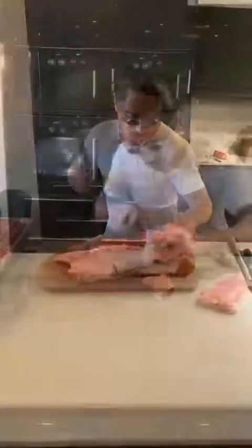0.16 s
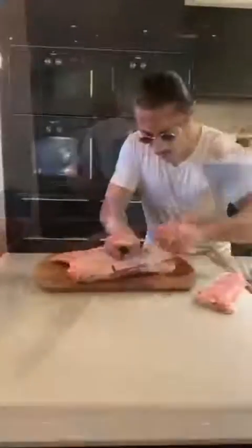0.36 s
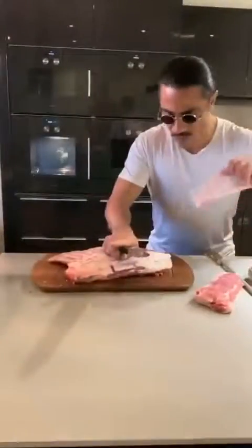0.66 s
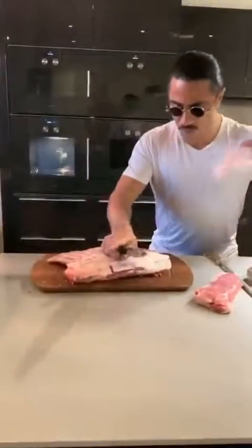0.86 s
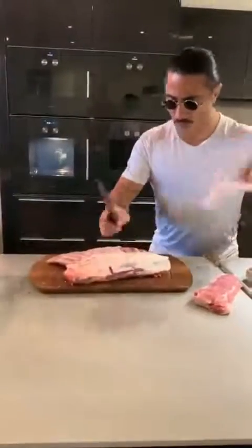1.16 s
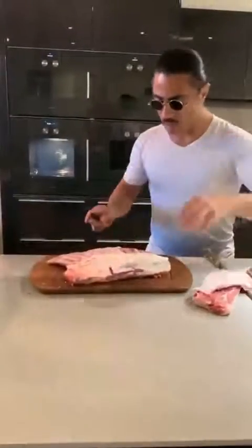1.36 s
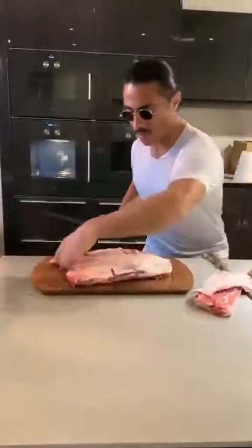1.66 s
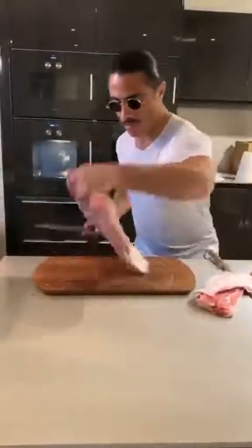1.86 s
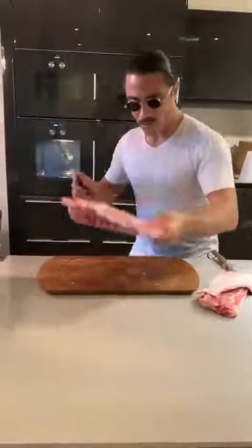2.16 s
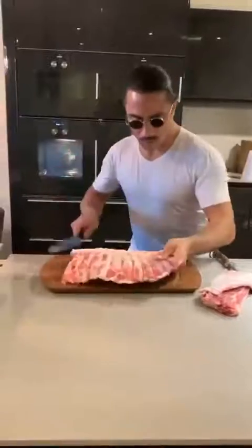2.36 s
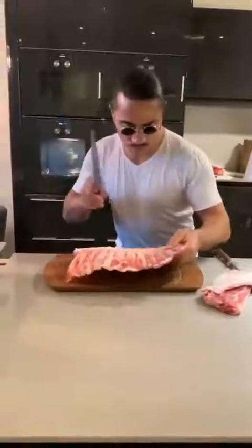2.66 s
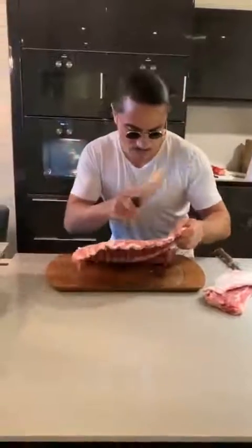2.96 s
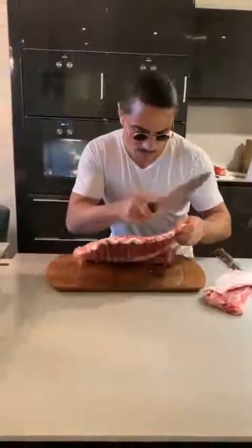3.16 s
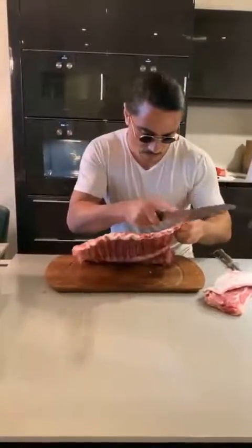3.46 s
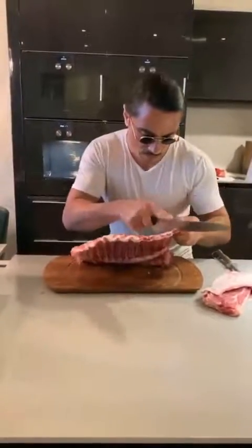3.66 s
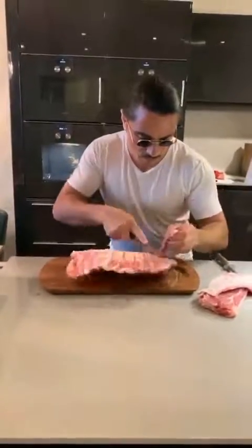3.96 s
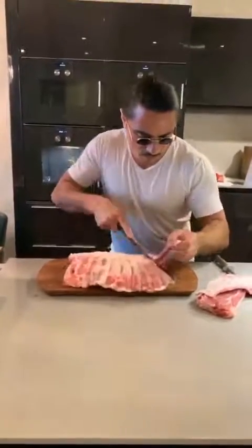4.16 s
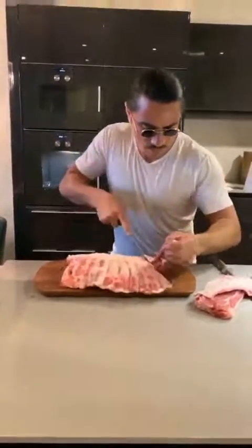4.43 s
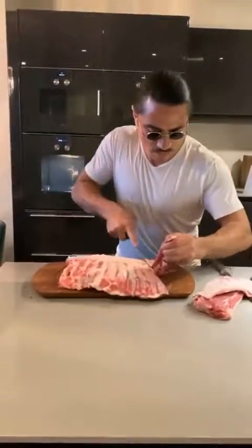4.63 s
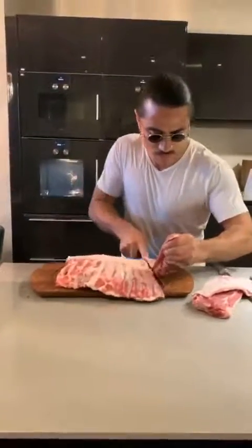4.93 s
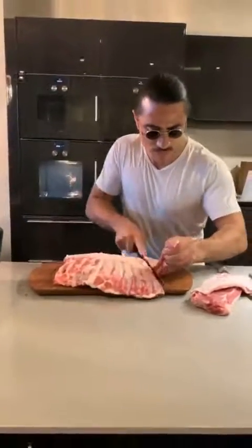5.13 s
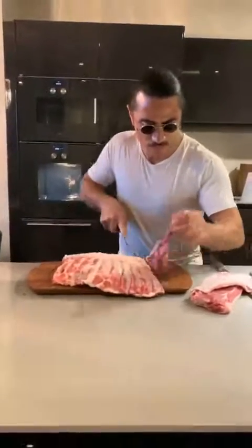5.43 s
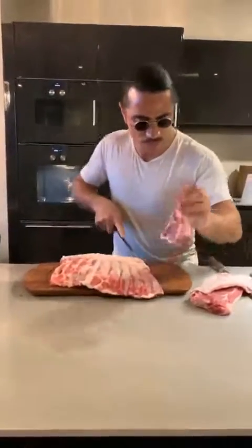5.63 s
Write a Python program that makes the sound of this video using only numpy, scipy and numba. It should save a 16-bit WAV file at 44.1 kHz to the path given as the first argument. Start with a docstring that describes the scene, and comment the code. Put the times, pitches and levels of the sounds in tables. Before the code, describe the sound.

In a hard-walled kitchen, wet meat smacks a board with a loud double slap, followed by soft knife strokes and faint clicks over hum.

```python
"""A kitchen with hard walls: a slab of raw ribs is torn, slapped and dropped on a wooden board on a counter,
and a long knife slides through it. Blows are noise cracks over ringing board modes; smearing, tearing and
sliding are crackly noise through resonances, with bands of grainy rubbing added. A faint tone swells once.
Diffuse echoes, a mains hum and room air lie around them. The phone turns itself down after loud blows."""
import sys
import numpy as np
from scipy import signal
from scipy.fft import rfft, irfft, next_fast_len
from scipy.io import wavfile
from scipy.ndimage import uniform_filter1d, minimum_filter1d
from numba import njit

SR = 44100
rng = np.random.default_rng(int(sys.argv[2]) if len(sys.argv) > 2 else 0)


def volts_from_decibels(level):
    """Turn decibel levels (scalar or array-like) into linear amplitude factors."""
    exponent = np.asarray(level, float) / 20
    return 10 ** exponent


def file_out(sig):
    """Save sig as 16-bit WAV at sys.argv[1]."""
    # one column per channel
    cols = np.atleast_2d(sig).T
    # limit, then scale
    lim = np.clip(cols, -1, 1)
    pcm = np.round(lim * 32767).astype(np.int16)
    wavfile.write(sys.argv[1], SR, pcm)


N = 255339
T = np.arange(N) / SR


def colour(x, points):
    """Filter by (Hz, dB) points joined on a log-frequency axis."""
    hz, db = np.transpose(points)
    n = next_fast_len(len(x))
    f = np.maximum(np.fft.rfftfreq(n, 1 / SR), 1)
    gain_db = np.interp(np.log(f), np.log(hz), db)
    return irfft(rfft(x, n) * volts_from_decibels(gain_db), n)[:len(x)]


def unit(x):
    """Scale to rms 1."""
    return x / np.sqrt(np.mean(x ** 2))


def walk(rate_hz):
    """Random levels held 1 / rate_hz s and slewed twice; spread near 1."""
    k = int(SR / rate_hz)
    steps = np.repeat(rng.standard_normal(N // k + 1), k)
    return 1.7 * uniform_filter1d(uniform_filter1d(steps, k), k)[:N]


def grains(sparse_db):
    """Noise whose samples have a long-tailed size: wet crackle."""
    size = uniform_filter1d(rng.exponential(size=N), size=24)
    return rng.standard_normal(N) * volts_from_decibels(sparse_db * size * 2)


def contacts(spray_db=-23):
    """Every blow and click as (s, crack, knock, tick, spray, thud dB); spray_db is wet spray against the tick."""
    # Blows on the board. Each row: start in seconds, crack in dB, then knock, tick and thud in dB re crack.
    struck = [(0.0034, -35, -2, -11, -1.5), (0.0611, -47, -38, -5.5, 12.5),
              (0.352, -8.5, -17.5, -13, -18.5), (0.363, -33.5, -14, 0, 19), (0.413, -38.5, 12.5, -7, 13.5),
              (0.473, -37.5, 4, -29, 12.5), (1.25, -28.5, -15, -20, -23.5), (1.265, -38.5, -19, -6, -1),
              (1.6027, -37.5, 10.5, -10.5, -18.5), (1.6187, -51, 15.5, 4.5, 16.5),
              (1.6535, -60, 16, -5, 27), (1.738, -49, 7, -9, -8), (1.7895, -45, -4, -1, -16),
              (2.2224, 4, 3.5, -18.5, -15.5), (2.2384, -14.5, -11.5, -11.5, 9),
              (2.2465, -8.5, -3.5, -40.5, -14.5), (2.262, -9.5, 2.5, -15, -5.5), (2.27, -5, 0, -26, -6.5),
              (2.2866, -14.5, 2, -21.5, 2.5), (2.3054, -16, -13, -0.5, -14), (2.3134, 10, -15.5, -8, -28.5),
              (2.3164, -10, 11.5, -10, -4.5), (3.457, -73.5, 24.5, -19, 3.5), (3.6374, -66, 18, -17, 17),
              (3.966, -54, -3, -11, -3), (4.0312, -24, -9.5, -21.5, -16), (4.1412, -68, 22, -13, 2),
              (4.632, -61, 19, -22, 20), (4.8996, -55.5, -18, -4, 12)]
    # Faint wet clicks as meat comes unstuck. Each row: start in seconds, level in dB.
    unstuck = [(0.933, -73), (0.963, -61), (1.993, -60), (2.9395, -60.5), (3.381, -65), (4.285, -61),
               (3.712, -67), (4.614, -55.5), (5.036, -61)]
    # Crack, knock, tick, spray and thud of a click, in dB re its level.
    click_parts_db = [6, -8, -3.5, -5, 5.5]
    hits = []
    for s, crack, knock, tick, thud in struck:
        hits.append((s, crack, crack + knock, crack + tick, crack + tick + spray_db, crack + thud))
    for s, db in unstuck:
        hits.append((s, *(db + np.array(click_parts_db))))
    return hits


def blows(brush_db=-18, scuff=0.84, crack_db=-6, ring_db=-7, swell_cycles=0.06, hold_s=0.005, spot_db=1.0):
    """One main contact in a short scuff of small ones sets the modes ringing; a crack of noise rides on it."""
    # Centres of crack, knock, tick, spray and thud, in Hz.
    part_hz = [1500, 500, 3700, 9000, 100]
    # Ringing modes of board and counter. Each row: nominal frequency in Hz, relative level in dB, T60 in seconds.
    modes = [(51, 0.5, .15), (78.6, 7, 0.13), (142.9, 7.5, 0.09), (245, -4.5, 0.05), (325, -0.5, 0.041),
             (413.4, -1, 0.036), (505.5, 6.5, 0.0096), (607, -5.5, 0.03), (693.3, -8, 0.036),
             (850, -13, 0.011), (1042, -3, 0.0044), (1210, -11.5, 0.012), (1370, -8.5, 0.004),
             (1492, -9.5, 0.018), (1754, -12, 0.017), (1913, -2, 0.022), (2215, -6, 0.039),
             (2432, -9.5, 0.009), (2654, -11, 0.0082), (2908, -6, 0.012), (3303, -4, 0.0095),
             (3665, -2.5, 0.013), (4062, -7, 0.009), (4477, -8.5, 0.0087), (4620, -12, 0.0093),
             (5040, -13, 0.011), (5397, -17, 0.011), (6050, -16.5, 0.011), (6700, -16.5, 0.01)]
    rise_s, press_s, fall_s = 0.0012, 0.007, 0.0035
    t, lead = np.arange(SR // 4) / SR, SR // 80
    near = np.arange(SR // 20) / SR - lead / SR
    # a light brush, the landing, a short press, release
    before = np.exp(near / rise_s) + volts_from_decibels(brush_db) * (1 + near * SR / lead)
    after = np.exp(-np.maximum(near - press_s, 0) / fall_s)
    shape = np.where(near < 0, before, after)

    hz, mode_db, t60 = np.array(modes).T[:, :, None]
    # soft meat spreads the contact: each mode swells in over part of its cycle and holds while the push lasts
    swell = (1 - np.exp(-t * hz / swell_cycles)) ** 2
    fade = swell * 1000. ** (-np.maximum(t - hold_s, 0) / t60)

    out, by_hz = np.zeros(N + SR), np.argsort(part_hz)
    for s, *parts in contacts():
        tilt = np.transpose([part_hz, parts])[by_hz]
        push_noise, crack_noise = rng.standard_normal((2, len(near)))
        detune, side, spot = rng.standard_normal((3, *hz.shape))  # each blow lands on another spot
        tilt_db = np.interp(np.log(hz), np.log(tilt[:, 0]), tilt[:, 1])
        gain = np.sign(side) * volts_from_decibels(mode_db + spot_db * spot + tilt_db)
        ring = np.sum(gain * np.sin(2 * np.pi * hz * (1 + 0.011 * detune) * t) * fade, axis=0)
        scuffing = scuff * push_noise * shape / np.sqrt(np.sum(shape ** 2))
        push = colour(scuffing, [(500, -17.5), (1100, -2.5)])
        push[lead] += 1  # the main contact
        sound = volts_from_decibels(ring_db) * signal.fftconvolve(push, ring)
        crack_curve = [(200, parts[1] - 25), *tilt[1:], (15000, parts[3] - 4)]
        sound[:len(near)] += volts_from_decibels(crack_db) * colour(shape * crack_noise, crack_curve)
        i = int(s * SR)
        out[i:i + len(sound)] += sound
    return out[lead:lead + N]


def pressure(edge_s=0.013):
    """Gain in time, drag dB and hiss dB of every smear and stroke."""
    # Meat smearing on after a blow. Each row: start in seconds, rub in dB, fall in dB per second,
    # drag and hiss in dB re rub.
    smears = [(0.0, -50, 172, 1.5, -22), (0.366, -28, 271, -3, -7.5), (1.259, -42, 419, -5, -10.5),
              (1.629, -56.5, 76, 5, -28), (1.788, -59, 288, -10.5, -20), (2.231, -37, 302, -1.5, -13),
              (2.324, -37, 202, -10, -7.5), (4.048, -40.5, 260, -0.5, -53)]
    # Tearing, sliding and the blade drawn through meat. Each row: start and length in seconds, peak rub in dB,
    # drag and hiss in dB re rub.
    strokes = [(0.046, 0.61, -79.5, 1.5, -2), (0.328, 0.062, -50, -2, -20), (0.386, 0.16, -34, -3.5, -9),
               (0.923, 0.086, -81.5, -12, 9), (1.023, 0.21, -66.5, -12, -24), (1.411, 0.074, -84, 11, -25),
               (1.728, 0.066, -64.5, 8, -34), (1.774, 0.032, -54, -2, -31), (1.932, 0.52, -63.5, -17, -33),
               (3.676, 0.1, -67.5, -6, -10.5), (3.743, 0.24, -60.5, -12, -7.5),
               (3.906, 0.2, -63, -5, -10.5), (4.253, 0.16, -68, -18, -15), (4.447, 0.23, -61, -2, -27),
               (4.595, 0.2, -60, 8, -35), (4.719, 0.27, -55.5, 6, -33), (5.036, 0.43, -51, -8, -15),
               (5.722, 0.11, -64, -10, -22)]
    for s, db, fall, drag_db, hiss_db in smears:
        on = np.clip((T - s) / edge_s + 1, 0, 1)
        yield on * volts_from_decibels(db - fall * np.maximum(T - s, 0)), drag_db, hiss_db
    for s, length, db, drag_db, hiss_db in strokes:
        # bites, swells to its peak, sags a little, then fades; dB re peak by share of length
        swell_db = np.interp((T - s) / length, [0, 0.35, 0.54, 1], [-6.5, 0, -4, -19.5])
        start = (T - s) / edge_s + 0.5
        end = (s + length - T) / edge_s / 4 + 1
        yield np.clip(np.minimum(start, end), 0, 1) * volts_from_decibels(db + swell_db), drag_db, hiss_db


def rubs(brighten=0.27, mean_hiss_db=-18, patchy_db=4.5):
    """Crackly friction rings the board's broad resonances; a dull pulsing drag below and a wet hiss above."""
    # Broad resonances. Each row: centre in Hz, width in Hz, mean relative level in dB.
    resonances = [(740, 48, -6.5), (1050, 150, -9), (1475, 120, -11.5), (1840, 200, -7), (2093, 150, -5.5),
                  (2640, 120, -14.5), (3030, 170, -13.5), (3720, 120, -14), (4130, 80, -18),
                  (4500, 110, -19)]
    # Spectrum of the wet hiss. Each row: frequency in Hz, relative level in dB per Hz.
    hiss_curve = [(2650, -16.5), (4500, -5), (5500, 4), (7050, 4.5), (8880, -2), (13800, 0.5),
                  (14700, -1.5), (15000, -42)]
    n = next_fast_len(N)
    f = np.fft.rfftfreq(n, 1 / SR)
    grit = grains(1.5)
    body = 0.37 * grit
    # the contact wanders, so each resonance comes and goes on its own
    for hz, width, db in resonances:
        rung = irfft(rfft(grit, n) / (1 + 2j * (f - hz) / width), n)[:N]
        body = body + volts_from_decibels(db + patchy_db * walk(14)) * rung
    rub = unit(colour(body, [(450, -36), (750, 3.5), (950, 8.0), (4500, -1.0), (6600, -28.5)]))
    upper = colour(rub, [(1700, -30.5), (2600, -4.0)])
    dull = colour(grains(2.0), [(250, -18.5), (430, -8.5), (545, -0.6), (630, -7.5), (800, -45.5)])
    drag = unit(volts_from_decibels(3.28 * walk(60)) * dull)
    hiss = unit(volts_from_decibels(1.5 * walk(36)) * colour(grains(4.3), hiss_curve))
    out = 0
    for gain, drag_db, hiss_db in pressure():
        # smears and strokes with more hiss also have stronger upper resonances
        bright = volts_from_decibels(brighten * (hiss_db - mean_hiss_db)) - 1
        mix = rub + bright * upper + volts_from_decibels(drag_db) * drag + volts_from_decibels(hiss_db) * hiss
        out = out + gain * mix
    return out * volts_from_decibels(0.52 * walk(32) + 1.2 * walk(22))


def rub_bands(flicker_db=1.5):
    """Bands of grainy rubbing: each swells and fades, some scraping like a blade, some dull like smearing meat."""
    # Each row: start and length in seconds, peak level before flicker in dB, centre in Hz, width in Hz.
    bands = [(1.667, 0.06, -67, 2380, 200), (3.753, 0.13, -61.5, 3907, 897), (4.4, 0.11, -69, 2150, 200),
             (4.04, 0.2, -58.5, 900, 500), (4.443, 0.13, -68, 1022, 200), (5.04, 0.19, -51, 2520, 1300),
             (5.071, 0.25, -59.5, 4110, 1300), (5.73, 0.11, -63, 2180, 300)]
    out = 0
    for s, length, db, hz, width in bands:
        curve = [(hz - width, -30), (hz - width / 2, 0), (hz + width / 2, 0), (hz + width, -30)]
        band = unit(colour(grains(1.3), curve))
        swell = np.sin(np.pi * np.clip((T - s) / length, 0, 1))
        out = out + volts_from_decibels(db + flicker_db * walk(33)) * swell * band
    return out


def squeak(middle_s=3.44, peak_db=-68.5, half_width_s=0.053, hz=2290):
    """A faint, thin, slightly wavering tone that swells and fades."""
    swell = np.exp(-((T - middle_s) / half_width_s) ** 2 / 2)
    level = volts_from_decibels(peak_db + 3.16 * walk(40.1)) * swell
    return level * np.sin(2 * np.pi * hz * T + 0.89 * walk(30))


def counter(x, lag_ms=1.0, bounce=0.043):
    """The counter top sends a weak second copy just behind the first, which ripples the spectrum."""
    return x + bounce * np.interp(T - lag_ms / 1000, T, x)


def room(x, wet_db=-14, gap_s=0.004):
    """Diffuse echoes: noise in which every frequency dies at its own rate."""
    # Each row: frequency in Hz, T60 in seconds, relative level in dB.
    decays = [(146, 0.61, 1), (469, 0.77, -2.5), (1350, 0.77, -0.5), (3230, 0.78, -4.5), (6700, 0.55, 0),
              (11100, 0.18, -17.5)]
    hz, t60, db = np.transpose(decays)
    f, t, cells = signal.stft(rng.standard_normal(SR), SR, nperseg=256)
    t60, db = (np.interp(np.log(f + 1), np.log(hz), v)[:, None] for v in (t60, db))
    tail = signal.istft(cells * volts_from_decibels(db) * 1000. ** (-t / t60), SR, nperseg=256)[1][:SR]
    tail = tail * (np.arange(SR) > gap_s * SR)
    tail = tail / np.sqrt(np.sum(tail ** 2))
    return volts_from_decibels(wet_db) * signal.fftconvolve(x, tail)[:N]


def kitchen(hum_hz=100.1, air_db=-48):
    """Hum at about twice the mains rate, wavering slightly, over room air whose rumble flickers."""
    # Course of the hum. Each row: time in seconds, mean level in dB rms.
    hum_course = [(0, -40.5), (0.299, -49), (0.551, -42.5), (3.002, -42.5), (5.79, -45.5)]
    # Spectrum of the air. Each row: frequency in Hz, relative level in dB per Hz.
    air_curve = [(20, -38.5), (40, -8.5), (65, -9), (110, -13.5), (172, -11), (213, -16.5), (310, -22),
                 (440, -32), (880, -35.5), (1500, -39.5), (2370, -52), (4000, -62.5), (6500, -67),
                 (10000, -68), (14000, -77.5)]
    s, db = np.transpose(hum_course)
    hum_level = np.sqrt(2) * volts_from_decibels(np.interp(T, s, db) + 0.48 * walk(13.0))
    hum = hum_level * np.sin(2 * np.pi * hum_hz * T + 0.13 * walk(16))
    air = unit(colour(rng.standard_normal(N), air_curve))
    rumble = colour(air, [(300, 0.5), (700, -24.0)])
    flicker = volts_from_decibels(1.6 * walk(23)) - 1
    return hum + volts_from_decibels(air_db) * (air + flicker * rumble)


def scene():
    """Blows, rubbing and squeak with their echoes, over the kitchen."""
    near = counter(blows() + rubs() + rub_bands()) + squeak()
    return (near + room(near) + kitchen())[None]


@njit
def follow(want, down, up):
    """Gain falls quickly and recovers slowly."""
    out, g = np.empty(len(want)), 0.
    for i in range(len(want)):
        g += (want[i] - g) * (down if want[i] < g else up)
        out[i] = g
    return out


def band_limit(x):
    """A steep low-pass at the top of the band."""
    return signal.sosfilt(signal.butter(12, 15720, fs=SR, output="sos"), x)


def record(dry, knee_db=-30, squeeze=0.38, attack_s=0.0027, hold_s=0.14, release_s=0.025):
    """The phone's gain control ducks everything above a knee, holds, then recovers; peaks are rounded."""
    # bass cut, and a steep top cut at the upper limit of the sound
    dry = signal.sosfilt(signal.butter(2, 45., "high", fs=SR, output="sos"), dry)
    dry = signal.sosfilt(signal.ellip(8, .2, 60, 15500., fs=SR, output="sos"), dry)
    loud_db = 10 * np.log10(uniform_filter1d(dry[0] ** 2, size=512) + 1e-12)
    duck_db = -squeeze * np.maximum(loud_db - knee_db, 0)
    half = int(hold_s * SR) // 2
    want_db = minimum_filter1d(duck_db, 2 * half + 1, origin=half)  # lowest over the past hold_s
    gain_db = follow(want_db, 1 / (attack_s * SR), 1 / (release_s * SR))
    return band_limit(np.tanh(dry * volts_from_decibels(gain_db)))


dry = scene()
out = record(dry)
file_out(out)
```